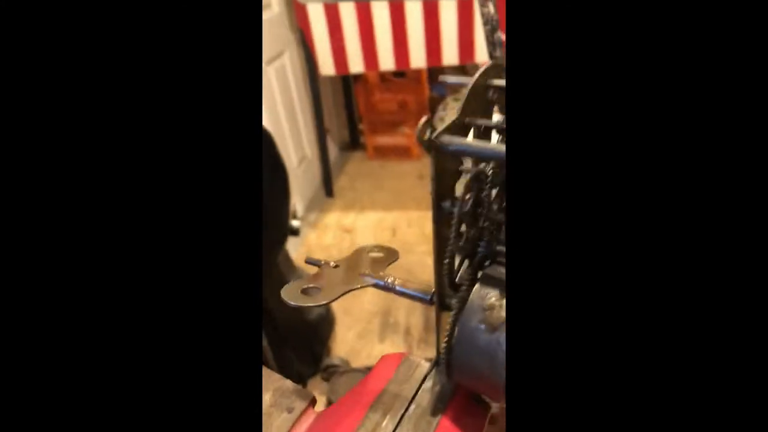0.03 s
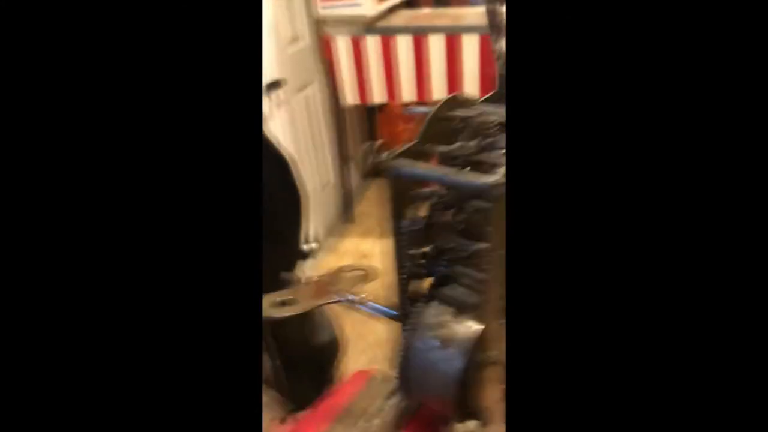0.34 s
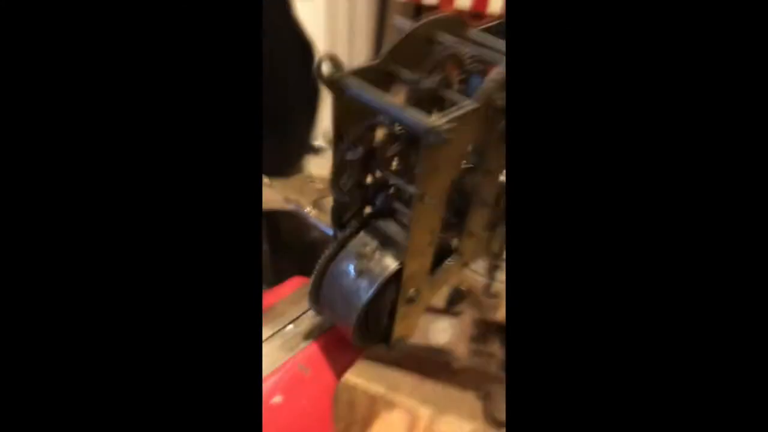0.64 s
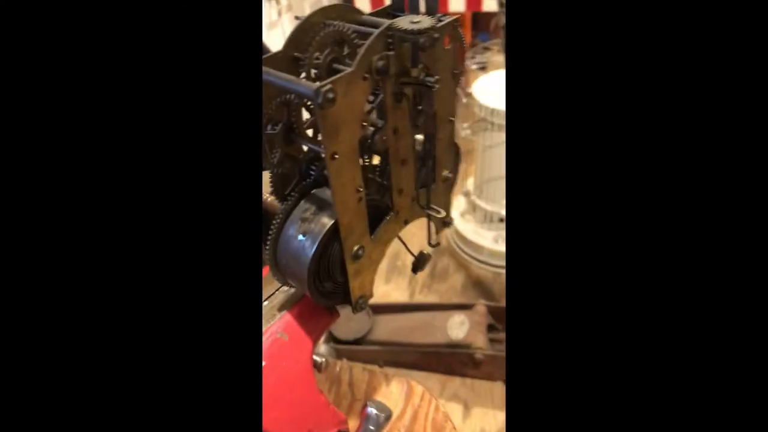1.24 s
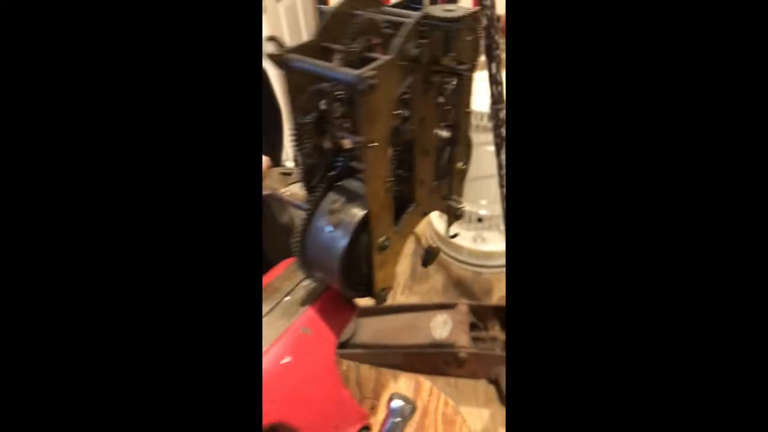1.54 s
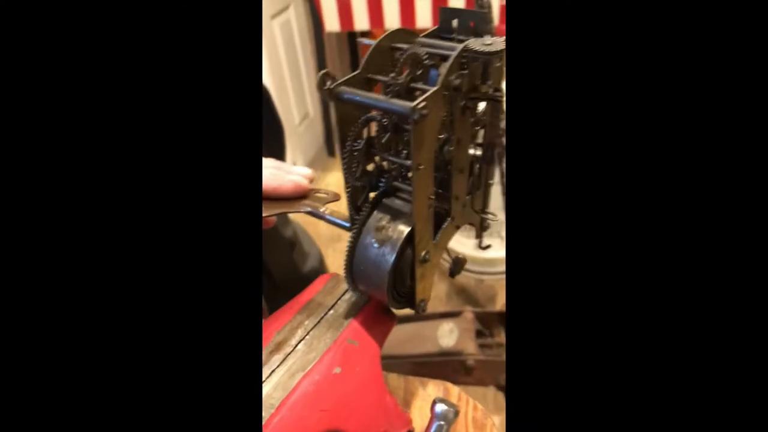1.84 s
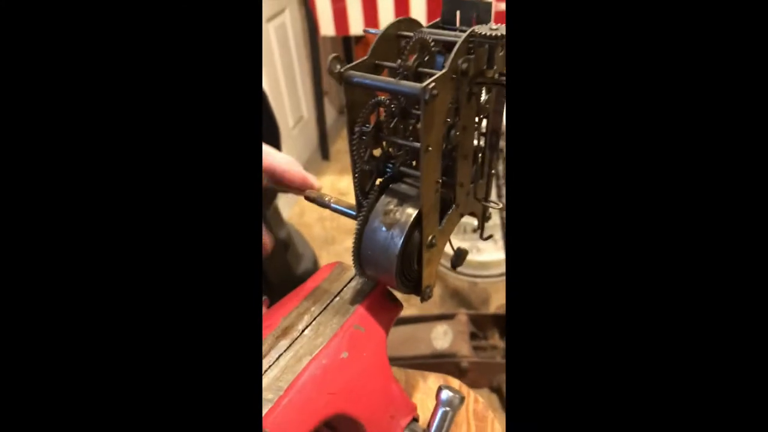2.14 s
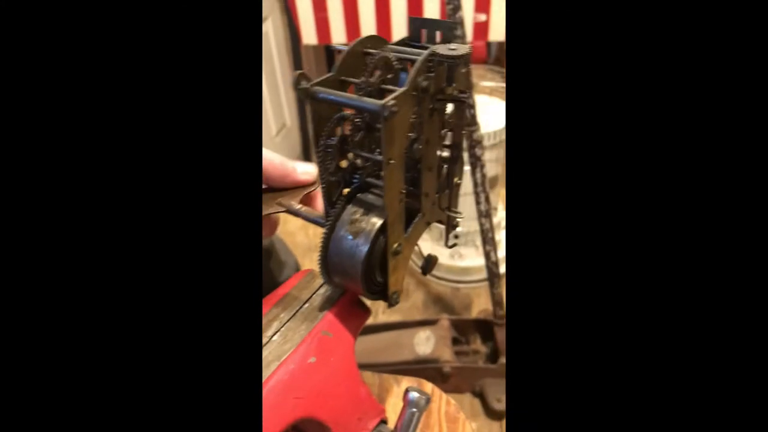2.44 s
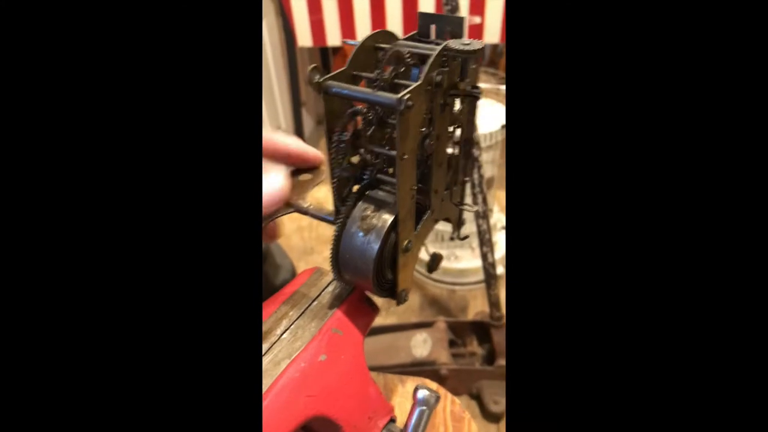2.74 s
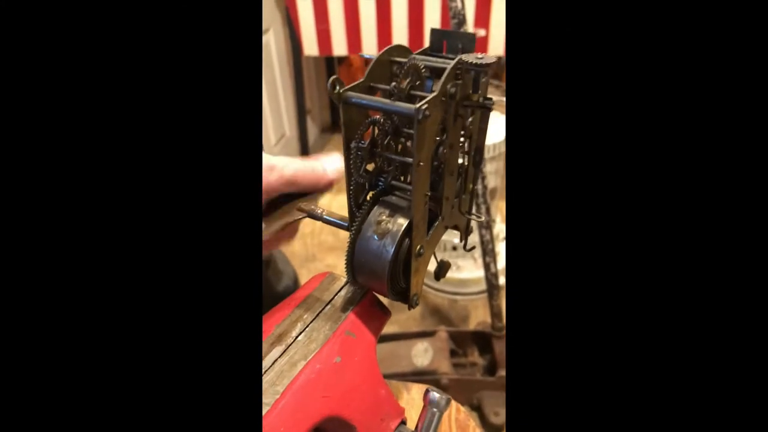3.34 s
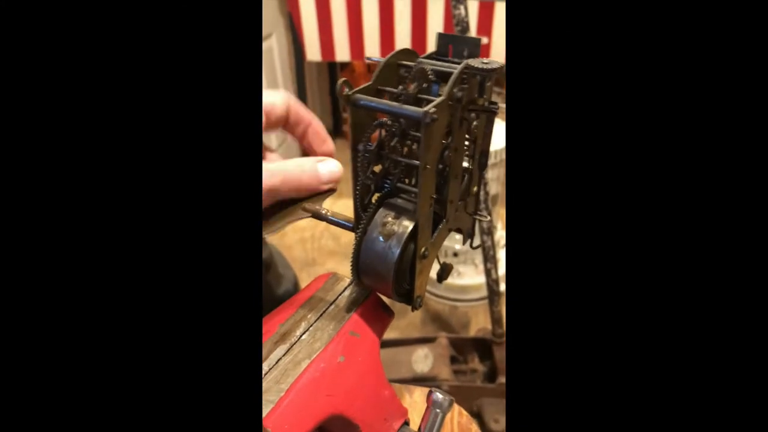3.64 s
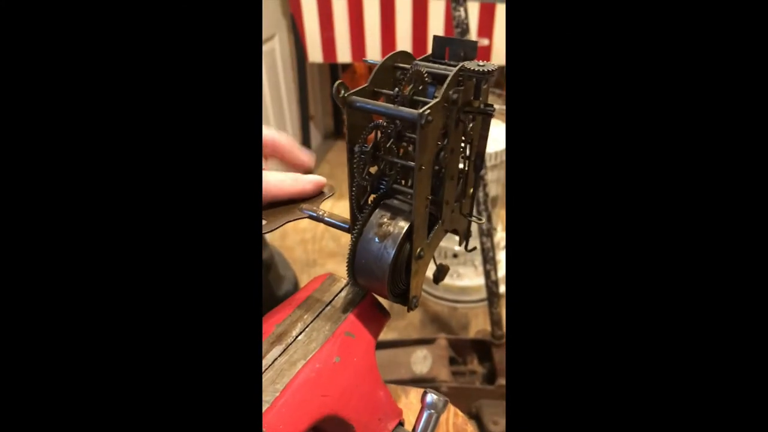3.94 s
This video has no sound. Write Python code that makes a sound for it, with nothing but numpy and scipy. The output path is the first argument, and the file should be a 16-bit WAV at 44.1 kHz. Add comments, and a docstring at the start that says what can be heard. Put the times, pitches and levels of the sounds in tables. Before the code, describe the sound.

A key winds a clock movement twice, its ratchet clicking sharply after soft handling bumps.

```python
"""A clock movement, held in a vice, is wound with a key, close by in a quiet workshop.
On each of two turns the pawl snaps over the ratchet teeth, rebounds and sets the brass frame ringing.
The key ticks in its play and rings as it seats; between turns the hand takes a new grip with dull knocks.
Rustle, taps and bumps of handling open the scene over a low hum. The metal sounds echo in the room."""
import sys
import numpy as np
from scipy import signal
from scipy.fft import rfft, irfft
from scipy.io import wavfile
from scipy.ndimage import uniform_filter1d

SR = 44100
rng = np.random.default_rng(int(sys.argv[2]) if len(sys.argv) > 2 else 0)


def int16_out(signal):
    """Quantize to a 16-bit WAV file."""
    q = np.round(np.clip(np.atleast_2d(signal).T, -1, 1) * 32767)
    wavfile.write(sys.argv[1], SR, q.astype(np.int16))


N = 176400
TIME, FREQ = np.arange(N) / SR, np.fft.rfftfreq(N, 1 / SR)
HIT_N = 8192  # samples in one impact
HIT_T, HIT_HZ = np.arange(HIT_N) / SR, np.fft.rfftfreq(HIT_N, 1 / SR)

# envelopes of the hum and the handling rustle: (time [s], level [dB])
HUM_ENVELOPE = [(0, -73), (1.55, -68), (1.72, -56), (2.3, -54), (2.76, -46.5), (2.88, -62), (3.098, -53.5),
                (3.5, -62), (3.82, -49.5), (4, -61)]
RUSTLE_ENVELOPE = [(0, -59), (.24, -61), (.31, -59), (.45, -59.5), (.49, -63.5), (.73, -76.5), (.84, -64.5),
                   (.93, -67), (1.24, -72), (1.29, -65.5), (1.36, -79), (1.62, -88), (1.69, -60.5),
                   (1.74, -91)]
# spectra of the noises, the impacts and the room's echoes: (frequency [Hz], gain [dB])
AMBIENT_SPECTRUM = [(25, -27), (59, -6), (108, -11.5), (135, -20.5), (229, -20), (309, -21.5), (489, -34.5),
                    (1480, -31.5), (2480, -41), (16000, -53.5)]
RUSTLE_SPECTRUM = [(250, -56), (450, -8.5), (650, -2), (850, -7.5), (1200, -8), (4400, -17.5),
                   (16000, -32.5)]
TAP_SPECTRUM = [(100, -0.5), (640, 2.5), (930, 3.5), (1700, -12), (2500, -14), (15000, -37)]
KNOCK_SPECTRUM = [(40, -26), (140, -1.5), (218, 3), (320, 0.5), (450, -12.5), (1500, -32), (5000, -73)]
SLEEVE_SPECTRUM = [(400, -10.5), (800, -5), (3300, -8.5), (12000, -25.5), (16000, -31)]
TICK_SPECTRUM = [(200, -8), (1500, -2), (5000, 0), (9000, -1), (16000, -12)]
SNAP_SPECTRUM = [(100, -30), (600, -25), (2200, -25.5), (3300, -12.5), (6000, -11), (8500, -5), (15500, -9),
                 (17000, -35)]
RUB_SPECTRUM = [(2000, 1.5), (4000, -8), (9900, -8.5), (10800, -19.5), (11850, 8), (13000, -14),
                (15400, -4.5)]
ROOM_SPECTRUM = [(1500, 8.5), (4000, 0.5), (6500, -2.5), (9000, -7.5), (13000, -4)]
# strokes that swell and fade: (start [s], duration [s], level [dB])
CREAK_STROKES = [(.02, .075, -59)]
SLEEVE_STROKES = [(.505, 0.1, -53.5), (.595, 0.095, -58), (.98, 0.039, -62.5)]
RUB_STROKES = [(2.584, 0.34, -73.5), (3.424, 0.069, -65.5), (3.55, 0.25, -69), (3.82, 0.066, -66)]
GRIP_STROKES = [(2.62, 0.32, -63.5), (3.66, 0.1, -62)]
# hollow taps, and knocks of hands on clock and bench: (time [s], level [dB], decay time [s])
HOLLOW_TAPS = [(0.129, -52.5, 0.0088), (0.336, -55.5, .012), (0.394, -51.5, 0.016), (0.457, -50, 0.0063)]
HAND_KNOCKS = [(.13, -59.5, 0.25), (0.393, -40, 0.03), (.828, -50, 0.024), (.869, -48.5, 0.021),
               (0.954, -44.5, 0.011), (1.073, -51, .012), (2.603, -49, 0.05), (2.708, -52, 0.016),
               (3.435, -48, 0.029), (3.546, -50.5, .02), (3.644, -47.5, 0.023), (3.687, -43.5, 0.039)]
# soft bumps on the microphone: (centre [s], level [dB], frequency [Hz], half duration [s])
SOFT_BUMPS = [(0.315, -36, 72, 0.009), (0.386, -43, 65, 0.02), (0.606, -35.5, 93, 0.011)]
# modes of bench, loose part, key, and frame with wheels: (frequency [Hz], level [dB], T60 [s])
BENCH_MODES = [(215.6, -39, 0.22), (138, -34.5, 0.17)]
LOOSE_MODES = [(4190, -51, 0.019), (4640, -49, 0.025), (5700, -46.5, 0.014), (11510, -57, .022)]
KEY_MODES = [(10208, -46.5, 0.09)]
FRAME_MODES = [(1590, -29.5, .12), (1782, -26, .12), (3945, -24.5, .055), (4160, -21.5, .055)]
# light contacts of key and pawl: (time [s], level [dB], decay time [s], clink [Hz], clink gain [dB])
KEY_TICKS = [(2.061, -57, 0.021, 6600, 14), (2.069, -52, 0.0036, 13000, 14.5),
             (2.476, -59, 0.0066, 3300, 6), (2.491, -59, 0.012, 5800, -1), (3.03, -54, 0.0094, 12400, 4),
             (3.404, -53.5, 0.01, 3840, 5.5), (3.4318, -52.5, 0.0029, 2590, 16.5),
             (3.685, -59.5, 0.0096, 4100, 12)]
# pawl dropping off a tooth: (time [s], level [dB], ring gain [dB], ring [Hz], rebound delay [ms])
PAWL_DROPS = [(2.1405, -37, 3, 7880, 1.7), (2.193, -34.5, 7, 6780, 1.7), (2.2305, -38, 8, 8700, 1.7),
              (2.2657, -34.5, 11.5, 9020, 0.65), (2.2973, -34.5, 12, 8370, 2.3),
              (2.3386, -36.5, 0, 8400, 0.8), (2.4065, -34.5, 4, 9150, 2.14),
              (3.0945, -35.5, 6.5, 8460, 1.3), (3.133, -40.5, 5.5, 9330, 0.83),
              (3.1687, -32.5, 11.5, 9700, 1.76), (3.1966, -30.5, 11.5, 8980, 1.7),
              (3.2248, -31, 10.5, 8920, 0.9), (3.2492, -37.5, 11, 9130, 2.4),
              (3.2809, -32.5, 9, 8450, 0.92), (3.331, -36, 1, 7940, 0.963)]
# damped resonances of pawl and wheel: (frequency [Hz], width [Hz], gain [dB], frequency scatter [ratio])
PAWL_RESONANCES = [(975, 240, 9, 0.031), (1660, 266, 14.5, 0.037), (2535, 120, 9, .015),
                   (3985, 140, 13, 0.024), (5590, 310, 8, .025), (6800, 540, 2.5, 0.012),
                   (10340, 200, -17.5, 0), (11780, 530, 8.5, 0.0095)]


def amp(db):
    """Amplitude ratio of a level in decibels."""
    return 10 ** (np.asarray(db) / 20)


def unit(x):
    """Normalisation to an rms of 1."""
    return x / np.sqrt(np.mean(x ** 2) + 1e-20)


def gain_db(spectrum, hz=HIT_HZ):
    """Interpolation of a spectrum on a logarithmic frequency axis."""
    points_hz, db = np.transpose(spectrum)
    return np.interp(np.log(hz + 1), np.log(points_hz + 1), db)


def level(points):
    """Amplitude envelope, linear in decibels between its points."""
    return amp(np.interp(TIME, *np.transpose(points)))


def strokes(rows):
    """Envelope of strokes whose power follows a half sine."""
    return sum(amp(db) * np.sqrt(abs(np.sin(np.pi * np.clip((TIME - start) / length, 0, 1))))
               for start, length, db in rows)


def place(events):
    """Superposition of (start time, signal) pairs."""
    out = np.zeros(N)
    for start, sound in events:
        part = out[round(start * SR):][:len(sound)]
        part += sound[:len(part)]
    return out


def filtered_noise(gain):
    """White noise weighted in frequency, with an rms of 1."""
    return unit(irfft(rfft(rng.standard_normal(N)) * gain, N))


def noise(spectrum):
    """Stationary noise of a tabulated spectrum."""
    return filtered_noise(amp(gain_db(spectrum, FREQ)))


def wander(hz):
    """Slow random fluctuation: noise low-passed near hz."""
    return filtered_noise(np.exp(-(FREQ / hz) ** 2))


def resonance(hz, width):
    """Lorentzian resonance curve of unit height."""
    return 1 / (1 + (2 * (HIT_HZ - hz) / width) ** 2)


def burst(envelope, spectrum_db, span_s=.015):
    """Source and filter: micro-impacts drive a minimum-phase response; energy equals rms 1 over span_s."""
    force = rng.standard_normal(HIT_N) * envelope
    for _ in range(3):  # flatten the spectrum, then confine the force in time again
        force = irfft(np.exp(1j * np.angle(rfft(force)))) * np.sqrt(envelope / envelope.max())
    log_gain = np.log(amp(np.r_[spectrum_db, spectrum_db[-2:0:-1]]))
    response = np.exp(np.conj(signal.hilbert(log_gain)))[:len(HIT_HZ)]
    return unit(irfft(rfft(force) * response)) * np.sqrt(span_s * SR / HIT_N)


def ring(modes, spread_db=0):
    """Free vibration: a sum of exponentially damped modes of random phase."""
    return sum(amp(db + spread_db * rng.standard_normal()) * np.exp(-np.log(1000) * HIT_T / t60)
               * np.sin(2 * np.pi * (hz * HIT_T + rng.random())) for hz, db, t60 in modes)


def soft_onset(rise_s=.004):
    """Exponential rise of the response to a soft blow."""
    return 1 - np.exp(-HIT_T / rise_s)


def background(hum_hz=56.75, waver_rad=.078, ambient_db=-58.5):
    """A low hum wavers by phase modulation over broadband room noise."""
    hum = np.sqrt(2) * np.sin(2 * np.pi * hum_hz * TIME + waver_rad * wander(6.6))
    ambient = noise(AMBIENT_SPECTRUM) * amp(ambient_db + .42 * wander(28))
    return level(HUM_ENVELOPE) * hum + ambient


def cloth(flicker_db=.68):
    """Sliding friction makes broadband noise: handling rustles, then a sleeve brushes past."""
    rustle = level(RUSTLE_ENVELOPE) * noise(RUSTLE_SPECTRUM) * amp(flicker_db * wander(34))
    return rustle + strokes(SLEEVE_STROKES) * noise(SLEEVE_SPECTRUM)


def creak(hz=652, width_hz=48):
    """Noise confined to a narrow band takes on a pitch, heard as a faint creak."""
    return strokes(CREAK_STROKES) * filtered_noise(np.exp(-((FREQ - hz) / width_hz) ** 2))


def taps():
    """Brief excitation of a broad midrange resonance sounds as a hollow tap."""
    return place((start, amp(db) * burst(np.exp(-HIT_T / decay), gain_db(TAP_SPECTRUM)))
                 for start, db, decay in HOLLOW_TAPS)


def knocks():
    """Soft impacts of hands on clock and bench excite mainly low frequencies, which die away quickly."""
    shudder = place((start, amp(db) * soft_onset() * np.exp(-HIT_T / decay))
                    for start, db, decay in HAND_KNOCKS)
    return shudder * noise(KNOCK_SPECTRUM)


def bumps():
    """Each soft bump on the microphone is a low-frequency wave packet with a Gaussian envelope."""
    return -sum(amp(db) * np.exp(-((TIME - centre) / half) ** 2) * np.cos(2 * np.pi * hz * (TIME - centre))
                for centre, db, hz, half in SOFT_BUMPS)


def bench_boom(start_s=.411):
    """A bump excites the low modes of the bench."""
    return place([(start_s, ring(BENCH_MODES) * soft_onset())])


def loose_part(start_s=1.263):
    """A loose part of the movement clinks in high, strongly damped modes."""
    return place([(start_s, ring(LOOSE_MODES))])


def key(seat_s=2.071, relative_width=.17):
    """Light impacts in the key's play excite one resonance each; seating on the arbor rings the key."""
    events = [(seat_s, ring(KEY_MODES))]
    for start, db, decay, clink_hz, clink_db in KEY_TICKS:
        spectrum = gain_db(TICK_SPECTRUM) + clink_db * resonance(clink_hz, relative_width * clink_hz)
        contact = np.exp(-(HIT_T / decay) ** 2 / 2)
        events.append((start, amp(db) * burst(contact, spectrum)))
    return place(events)


def snap(delay_s, rise_s=.00022, decay_s=.0007):
    """Force envelope of a hard steel impact: linear rise, exponential decay."""
    t = np.maximum(HIT_T - delay_s, 0)
    return np.minimum(t / rise_s, 1) * np.exp(-np.maximum(t - rise_s, 0) / decay_s)


def ratchet(rebound_db=-4, rattle_db=-4.5, rattle_s=.0043, tooth_db=2.6 + .2, comb_db=2.6):
    """Impact excitation: the pawl strikes, rebounds and rattles to rest; the frame rings on freely."""
    rattle = amp(rattle_db) * np.exp(-(HIT_T / rattle_s) ** 2)
    thinning_db_per_s = 1
    clicks = []
    for start, db, pawl_db, pawl_hz, rebound_ms in PAWL_DROPS:
        rebound_s = rebound_ms / 1000
        force = np.sqrt(snap(0) ** 2 + (amp(rebound_db) * snap(rebound_s)) ** 2 + rattle ** 2)
        spectrum = gain_db(SNAP_SPECTRUM) + pawl_db * resonance(pawl_hz, width=1320)
        # the resonances shift as the pawl seats on each tooth
        for hz, width, lift_db, scatter in PAWL_RESONANCES:
            spectrum += lift_db * resonance(hz * (1 + scatter * rng.standard_normal()), width)
        # as the spring tightens, the middle of the snap thins out
        spectrum -= thinning_db_per_s * (start - PAWL_DROPS[0][0]) * resonance(4340, width=2200)
        roughness = rng.standard_normal(len(HIT_HZ))
        spectrum += tooth_db * unit(uniform_filter1d(uniform_filter1d(roughness, size=50), size=50))
        # strike and rebound interfere as a comb filter
        spectrum += comb_db * np.cos(2 * np.pi * (HIT_HZ - pawl_hz) * rebound_s)
        frame = amp(-pawl_db / 2) * ring(FRAME_MODES, spread_db=4)
        clicks.append((start, amp(db) * (burst(force, spectrum) + frame)))
    return place(clicks)


def finger_rub(flicker_db=3):
    """Friction of fingers on the key gives a thin, flickering hiss."""
    return strokes(RUB_STROKES) * noise(RUB_SPECTRUM) * amp(flicker_db * wander(27))


def grip(flicker_db=2.8):
    """The hand taking a new grip rumbles as amplitude-modulated low-frequency noise."""
    return strokes(GRIP_STROKES) * noise(KNOCK_SPECTRUM) * amp(flicker_db * wander(24))


def room_response(delay_s=.0032, early_db=-11, early_decay_s=.0074, tail_db=-15, t60_s=.37):
    """Impulse response: early reflections from bench and vice, then the workshop's diffuse tail."""
    t = TIME[:SR // 2]
    _, frame_s, spectra = signal.stft(rng.standard_normal(len(t)), SR, nperseg=256)
    tail = signal.istft(spectra * np.exp(-np.log(1000) * frame_s / t60_s), SR, nperseg=256)[1][:len(t)]
    sparse = rng.standard_normal(len(t)) * (rng.random(len(t)) < .05)
    early = sparse * np.exp(-t / early_decay_s)
    tail, early = tail * (t > delay_s), early * (t > delay_s)
    echoes = amp(tail_db) * tail / np.linalg.norm(tail) + amp(early_db) * early / np.linalg.norm(early)
    colour = amp(gain_db(ROOM_SPECTRUM, np.fft.rfftfreq(SR, 1 / SR)))
    return irfft(rfft(echoes, SR) * colour, SR)[:len(t)]


def room(direct, count=6, cycle_hz=5.3):
    """Reflection paths change as hands and microphone move: a cyclic crossfade of impulse responses."""
    position = TIME * cycle_hz * count
    shares = [np.maximum(1 - abs((position - k) % count - 1), 0) for k in range(count)]
    return direct + sum(signal.fftconvolve(direct * np.sqrt(share), room_response())[:N] for share in shares)


def scene():
    """Superposition in one channel: the clock with its echoes, the handling and the background."""
    clock = loose_part() + key() + ratchet() + finger_rub()
    handling = cloth() + creak() + taps() + knocks() + bumps() + bench_boom() + grip()
    return (room(clock) + handling + background())[None]


def record(dry):
    """Band limiting by a linear-phase low-pass filter."""
    low_pass = signal.firwin(161, cutoff=16300, window=("kaiser", 8), fs=SR)
    return signal.oaconvolve(dry, low_pass[None], "same")


dry = scene()
out = record(dry)
int16_out(out)
```